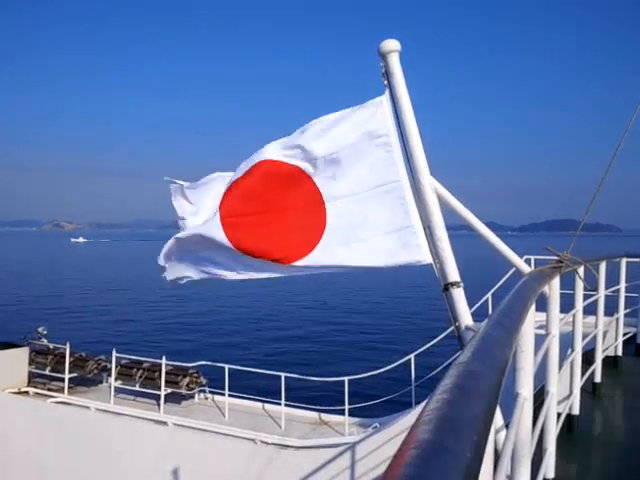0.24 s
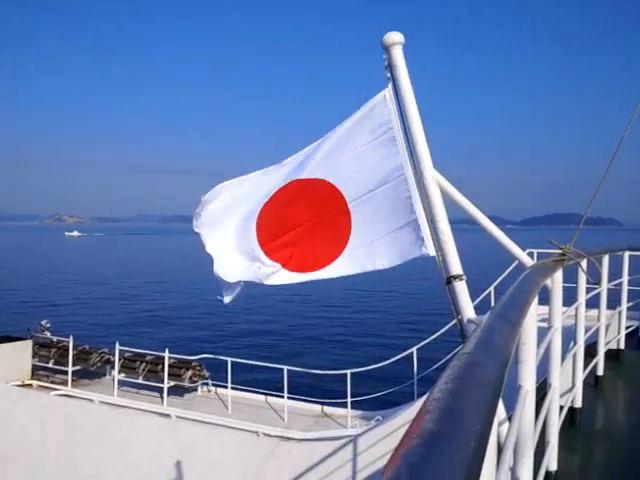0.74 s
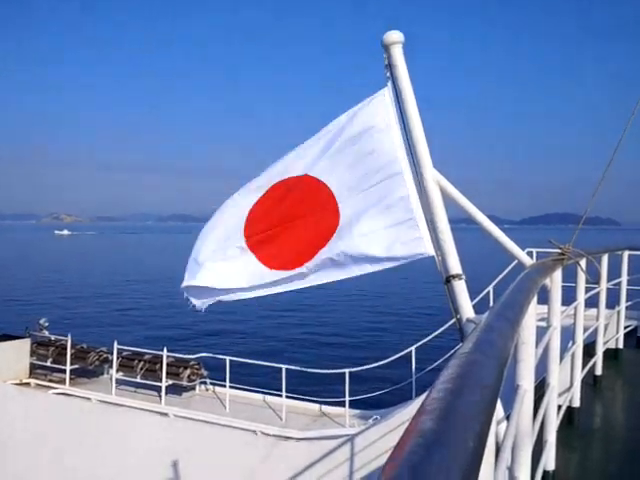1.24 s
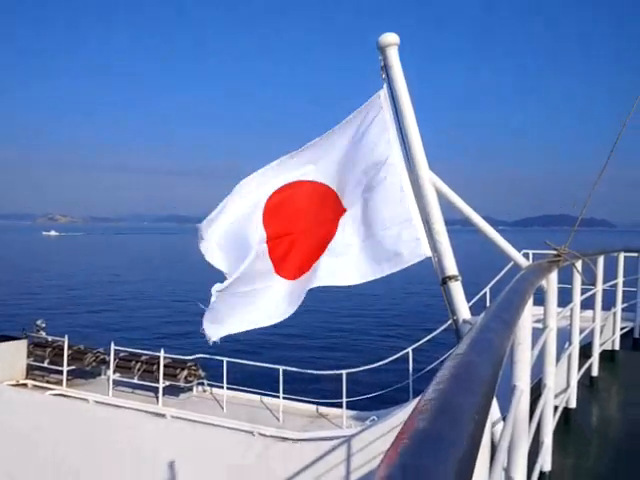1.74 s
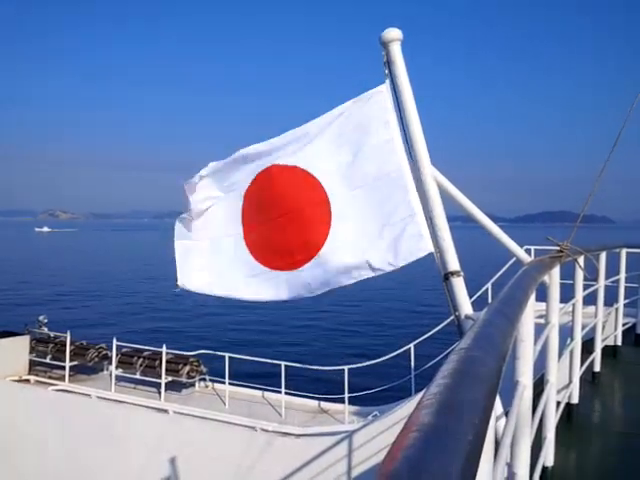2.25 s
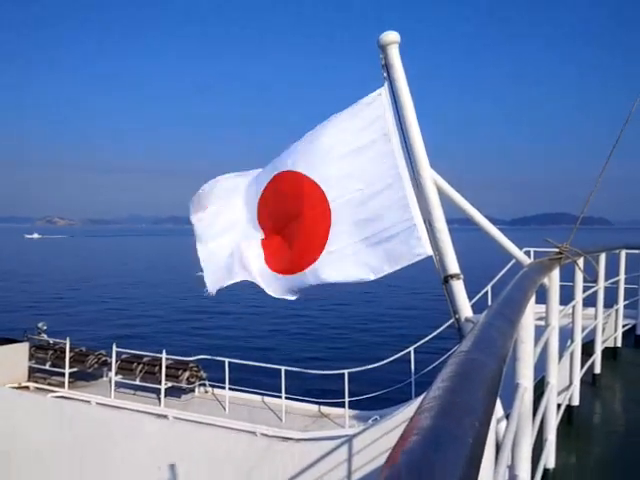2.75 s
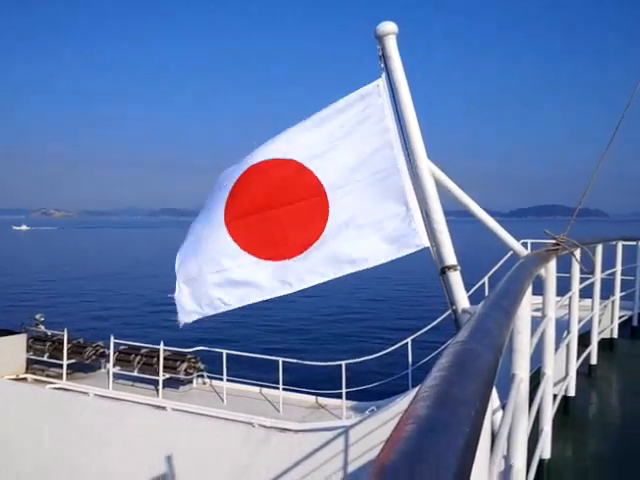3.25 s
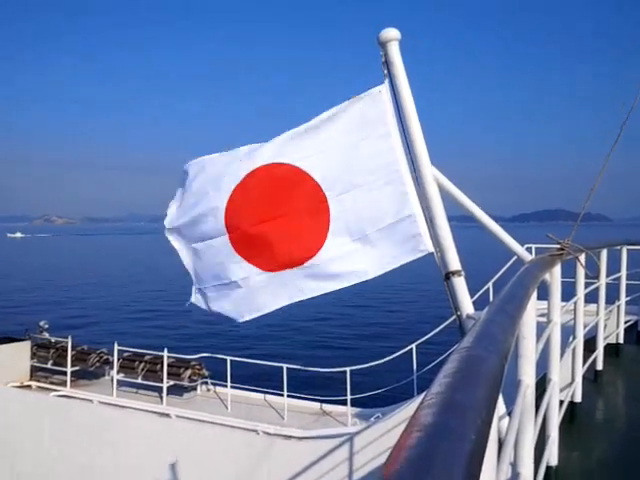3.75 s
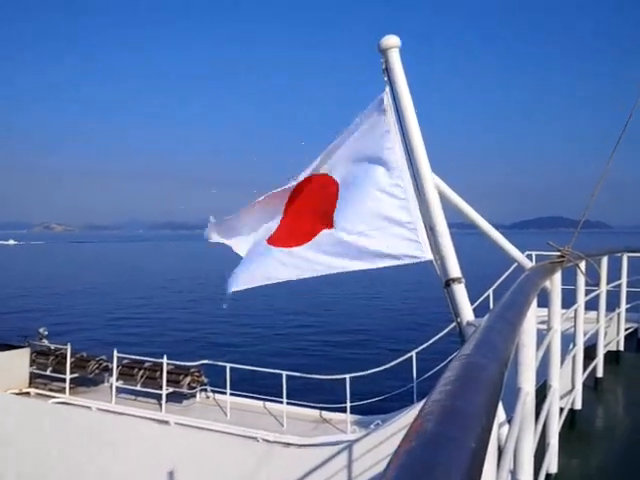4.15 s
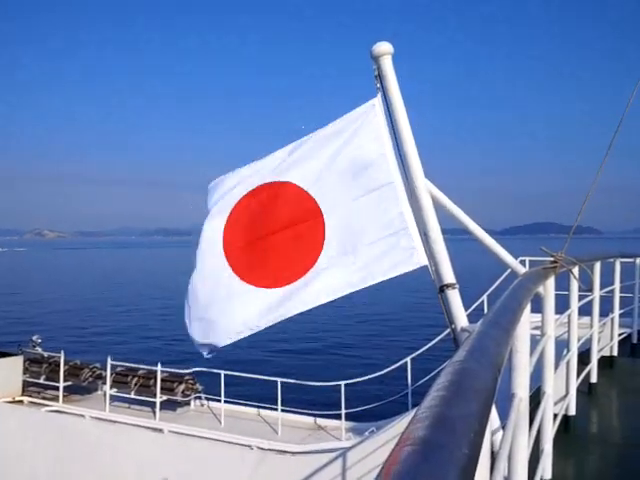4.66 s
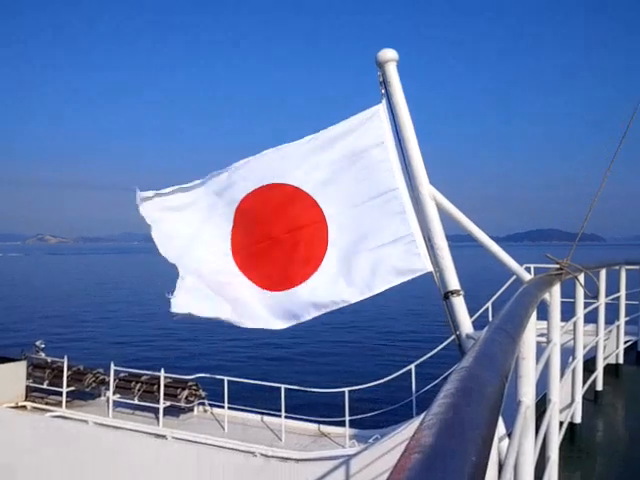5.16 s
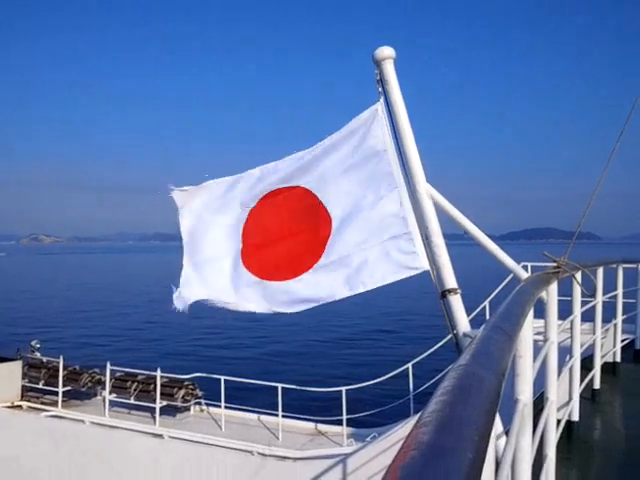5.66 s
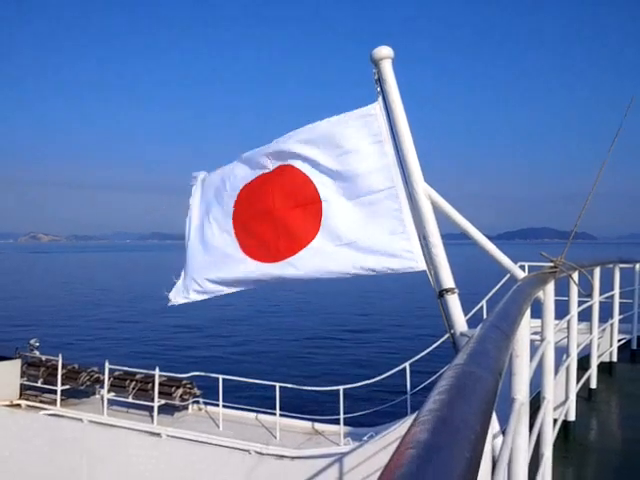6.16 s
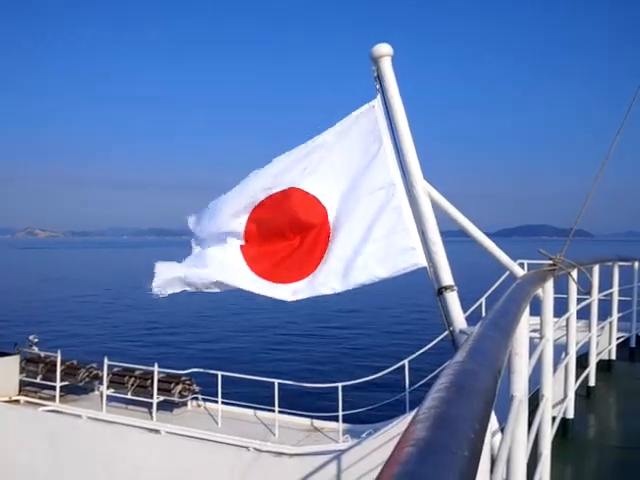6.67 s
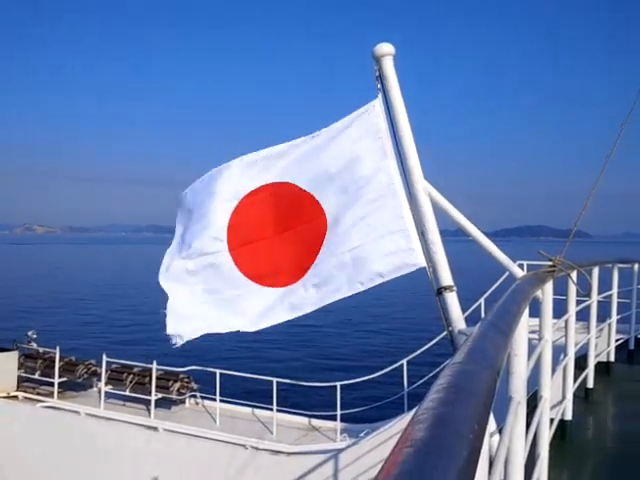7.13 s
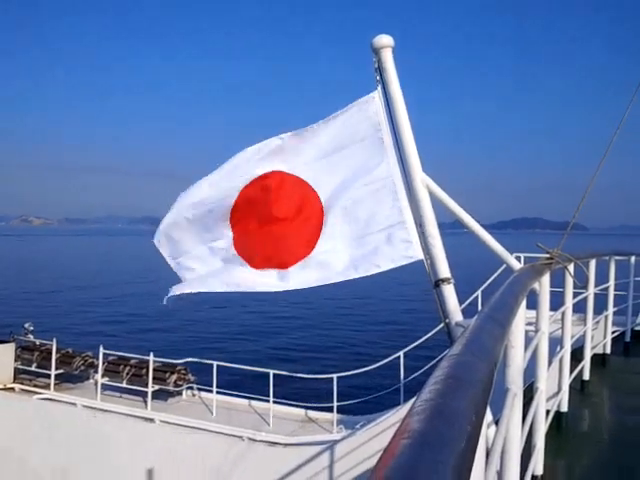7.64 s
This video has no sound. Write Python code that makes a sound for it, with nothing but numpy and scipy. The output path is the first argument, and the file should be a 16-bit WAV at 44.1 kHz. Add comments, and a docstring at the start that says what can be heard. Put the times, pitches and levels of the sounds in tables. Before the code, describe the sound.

Strong wind hits a small camera microphone on the open stern deck of a ship under way, for about 8 seconds. It begins at full strength: fast, irregular low thumps and knocks, overloaded and close, chopping the rush of air into a rough rasp. The deepest bass is thinned and the top is dull. Behind it, engine rumble, a low hum, thin wavering machinery whines and the soft hiss of foaming wake run throughout. Hard slaps with a short crackle pop at about 0.3, 0.9, 1.6, 2.1, 2.4, 3.6, 4.0 and 4.6 seconds, among softer buffets; a heavier thump lands near 5.5. The wake hiss rises gently around 5.8, and faint breathy whistles and puffs pass near 6.3 to 6.5. At 6.8 to 6.95 one fierce gust delivers a rapid volley of loud slaps, followed by single ones near 7.0 and 7.4. Buffeting continues, easing slightly at the end.

```python
"""Strong wind buffets a small camera's microphone on the stern deck of a ship under way.
From the start, huge swings of pressure overload the diaphragm: they thump, and chop the rush of air into a rasp.
Behind them machinery hums and whines and the wake hisses; soon eddies slap the port, and soft puffs of hiss pass.
The wake swells slowly once, a little before one hard gust hits the port with a volley of slaps near the end."""
import sys
import numpy as np
from scipy import signal
from scipy.fft import rfft, irfft
from scipy.io import wavfile
from scipy.ndimage import uniform_filter1d

SR = 44100
rng = np.random.default_rng(int(sys.argv[2]) if len(sys.argv) > 2 else 0)


def store_wav(level_fs):
    """Save 16-bit WAV to argv[1]."""
    pcm = np.round(np.clip(np.atleast_2d(level_fs), -1, 1) * 32767)
    wavfile.write(sys.argv[1], SR, pcm.T.astype(np.int16))


N = 348390
TIME = np.arange(N) / SR
FREQS = np.fft.rfftfreq(N, 1 / SR)


def amp(db):
    """Decibels to gain."""
    return 10 ** (np.asarray(db) / 20)


def unit(x):
    """Scales to rms 1."""
    return x / np.sqrt(np.mean(x ** 2) + 1e-20)


def noise():
    """White noise, the raw material of every breath, hiss and rumble."""
    return rng.standard_normal(N)


def colour(x, points):
    """Causal minimum-phase filter with the given spectrum, falling 24 dB per octave beyond its ends."""
    hz, db = np.transpose(points)
    octave, knots = np.log2(FREQS + 1), np.log2(hz)
    outside = abs(octave - np.clip(octave, knots[0], knots[-1]))
    gain_db = np.maximum(np.interp(octave, knots, db) - 24 * outside, -100)
    cepstrum = irfft(np.log(amp(gain_db)), N)
    # folding the cepstrum onto positive times makes the filter causal
    folded = cepstrum * (1 + np.sign(N / 2 - np.arange(N)))
    folded[0] = cepstrum[0]
    return irfft(rfft(x) * np.exp(rfft(folded)), N)


def wander(slow_hz, fast_hz):
    """Random motion of rms 1, with about equal power in each octave between two rates."""
    coarse = TIME[::30]
    hz = np.fft.rfftfreq(len(coarse), coarse[1])
    shape = hz / (hz + slow_hz) ** 1.5 / np.sqrt(1 + (hz / fast_hz) ** 4)
    spectrum = rfft(rng.standard_normal(len(coarse))) * shape
    return unit(np.interp(TIME, coarse, irfft(spectrum, len(coarse))))


def low_cut(x, corner_hz):
    """The microphone's steep wind filter."""
    return signal.sosfilt(signal.butter(N=7, Wn=corner_hz, btype="high", fs=SR, output="sos"), x)


def steadied(x, span_s):
    """Holds the slow level at 1 and keeps the fast flutter."""
    window = signal.windows.hann(max(int(span_s * SR), 8))
    power = signal.oaconvolve(x ** 2, window / window.sum(), "same")
    return x / np.sqrt(np.maximum(power, 1e-12))


def burst(x, s, hz, width_hz, db, half_s):
    """One band of x swells and fades once."""
    near = abs(TIME - s) < 2 * half_s + 0.05
    part = x[near]
    band = np.exp(-((np.fft.rfftfreq(len(part), 1 / SR) - hz) / width_hz) ** 2)
    banded = irfft(rfft(part) * band, len(part))
    swell = amp(db) * np.exp(-((TIME[near] - s) / half_s) ** 2)
    out = np.zeros(N)
    out[near] = steadied(banded, span_s=2 * half_s + 0.025) * swell
    return out


# spectrum of the wind's pressure on the diaphragm: (frequency [Hz], density [dB per Hz])
PRESSURE_COLOUR = [(8, -7), (25, -1.5), (60, -3.5), (120, -8), (240, -10), (480, -18.5), (1000, -43)]


def diaphragm(held):
    """Wind pressure drives the diaphragm into its stops: its travel, and the sensitivity left for other sound."""
    drive, lean, stall_pressure = 1.02, 0.25, 2.1  # pressures; 1 is well into the curve towards a stop
    swings = steadied(colour(noise(), PRESSURE_COLOUR), span_s=0.1)
    pressure = drive * swings + lean
    travel = np.tanh(pressure * (1 - held) + stall_pressure * held)
    return travel, 1 - travel ** 2  # the slope of tanh


def airflow():
    """The speed of the air over the deck wavers a little about its mean, as a gain."""
    waver_db = 0.76
    return amp(waver_db * wander(slow_hz=3.2, fast_hz=10))


# filter colours of the thumps and of their rattling flanks: (frequency [Hz], gain [dB])
THUMP_COLOUR = [(60, -27.5), (100, -24), (140, -14), (168, -1.5), (220, 1), (300, 3), (400, -0.5),
                (500, -4.5), (600, -7), (900, -33.5)]
RATTLE_COLOUR = [(300, -26), (400, -0.5), (480, -3), (720, 4), (950, -5.5), (1500, 1.5), (3000, -3)]
# eddies that swell and pass over the steady wind:
# (time [s], pitch [Hz], level [dB], half duration [s])
BUFFETS_OF_WIND = [(0.027, 234, -25.5, 0.025), (0.176, 225, -32, 0.041), (.35, 430, -29, 0.015),
                   (0.575, 228, -21.5, 0.023), (0.61, 480, -28, 0.027), (0.935, 293, -33, 0.032),
                   (0.973, 375, -25, 0.022), (1.065, 210, -24.5, 0.037), (1.09, 443, -30, 0.02),
                   (1.39, 260, -32, 0.11), (1.785, 251, -26.5, .045), (1.85, 526, -28, 0.073),
                   (2.134, 278, -29.5, 0.13), (2.12, 280, -26, 0.014), (2.122, 470, -29.5, 0.064),
                   (2.453, 317, -24, 0.012), (2.625, 250, -30.5, 0.054), (2.787, 283, -30, 0.048),
                   (3.015, 246, -20, 0.016), (3.42, 338, -26, 0.027), (3.47, 292, -25.5, 0.031),
                   (3.893, 205, -26, 0.065), (4.266, 248, -23.5, 0.033), (4.286, 465, -29, 0.027),
                   (4.354, 278, -22.5, 0.022), (4.495, 517, -27, 0.03), (4.72, 219, -24, 0.15),
                   (5.083, 235, -27.5, 0.047), (5.088, 400, -32.5, 0.036), (5.322, 317, -31, 0.023),
                   (5.529, 225, -17, 0.023), (5.516, 420, -33, .035), (5.8, 260, -30, 0.03),
                   (5.909, 232, -23, 0.022), (6.327, 195, -24.5, 0.027), (6.41, 390, -26, 0.023),
                   (6.743, 230, -29, 0.038), (6.927, 305, -18, 0.021), (6.91, 500, -26, 0.02),
                   (7.16, 340, -28, 0.049), (7.275, 367, -28.5, 0.024), (7.413, 265, -29, 0.025),
                   (7.55, 264, -25, 0.046)]


def wind(travel, flow):
    """Swings from stop to stop thump and their steep flanks rattle; a buffet swells thumps at its own pitch."""
    deep_db, knock_db, rattle_db = -29, -29, -33.5  # large eddies, smaller ones, flanks
    deep_restless_db, knock_restless_db = 1.1, 1.0
    split_hz, core_share = 269.0, 0.18  # core_share: a buffet's bandwidth as a share of its pitch
    thump = low_cut(colour(travel, THUMP_COLOUR), corner_hz=129.7)
    large = irfft(rfft(thump) / (1 + (FREQS / split_hz) ** 10), N)
    deep_level = amp(deep_db + deep_restless_db * wander(slow_hz=3.5, fast_hz=12.0))
    deep = steadied(large, span_s=0.048) * deep_level
    knock_level = amp(knock_db + knock_restless_db * wander(slow_hz=3.4, fast_hz=8.7))
    knock = steadied(thump - large, span_s=0.11) * knock_level
    buffets = sum(burst(thump, s, hz, core_share * hz, db, half_s) for s, hz, db, half_s in BUFFETS_OF_WIND)
    rattle = steadied(colour(travel, RATTLE_COLOUR), span_s=0.23) * flow * amp(rattle_db)
    return (deep + knock) * lull() + buffets + rattle


# colour of the rushing air: (frequency [Hz], density [dB per Hz])
RUSH_COLOUR = [(300, -10.5), (500, -2.5), (750, -2), (950, -2.5), (1350, -4.5), (1700, -9.5), (2000, -13),
               (2500, -18.5), (3100, -30), (4500, -43.5), (8000, -46)]
# brief breathy whistles: (time [s], pitch [Hz], width [Hz], level [dB], half duration [s])
EDGE_WHISTLES = [(.01, 1320, 70, -34, 0.044), (0.349, 1410, 280, -31, 0.015), (1.164, 1660, 80, -38, 0.018),
                 (4.988, 1790, 170, -41, 0.094), (6.255, 1285, 30, -33, 0.038),
                 (6.387, 1290, 64.5, -36, 0.027), (6.432, 1320, 60, -33.5, 0.02),
                 (6.498, 1096, 80.6, -35.5, 0.1), (6.848, 755, 60, -25, .025),
                 (6.915, 900, 60, -24.5, 0.03), (7.124, 1500, 400, -35.5, 0.021),
                 (7.495, 1303, 105, -28, 0.031)]


def air(flow):
    """Air rushes over the deck and now and then sings briefly on an edge."""
    rush_db = -32.0
    rush = unit(colour(noise(), RUSH_COLOUR)) * flow * amp(rush_db)
    turbulence = noise()
    return rush + sum(burst(turbulence, *whistle) for whistle in EDGE_WHISTLES)


# colour of the engine's rumble: (frequency [Hz], density [dB per Hz])
RUMBLE_COLOUR = [(80, -27), (100, -20.5), (125, -6.5), (165, 0.5), (210, -11), (300, -10)]
# steady tones of the ship's machinery: (pitch [Hz], level [dB])
MACHINE_TONES = [(199.5, -34), (1057.5, -50), (1300.5, -44.5), (1422, -50.5), (2357.5, -56.5), (2724, -66),
                 (3750, -75), (3779, -72), (4258.5, -69.5), (4666.5, -67.5), (4972, -69.5), (5691, -74)]


def ship():
    """Engine rumble and hum, with fan and turbine tones that waver slightly."""
    rumble_db, waver_db = -37, 2.2
    drift_hz = 1.2  # at 1300.5 Hz; it grows with pitch
    out = amp(rumble_db) * unit(colour(noise(), RUMBLE_COLOUR))
    for hz, db in MACHINE_TONES:
        pitch = hz + drift_hz * hz / 1300.5 * wander(slow_hz=3.9, fast_hz=18)
        tone = np.sin(2 * np.pi * np.cumsum(pitch) / SR)
        waver = amp(waver_db * wander(slow_hz=0.36, fast_hz=3.5))
        out += amp(db) * unit(tone * waver)
    return out


# colour of the foam's hiss: (frequency [Hz], density [dB per Hz])
HISS_COLOUR = [(1200, -10), (2200, 6), (2800, 6), (3800, 1), (4900, 3.5), (5600, -2), (6100, -7.5),
               (6900, -6.5), (7400, -21.5), (8100, -18)]
# slow course of the hiss: (time [s], level [dB])
WAKE_LEVEL = [(0, -47), (1.2, -48), (3.6, -48), (5.0, -48), (5.85, -45.5), (6.8, -47), (7.9, -48)]
# faint narrow bands of steady noise within the hiss: (pitch [Hz], width [Hz], level [dB])
NARROW_BANDS = [(5548, 45, -70.5), (5705, 50, -73.5), (6200, 70, -74.5), (6700, 40, -78), (6890, 35, -76.5)]


def wake():
    """Foam hisses behind the stern, with faint narrow bands of steady noise within the hiss."""
    shimmer_db = 0.94
    hiss = unit(colour(noise(), HISS_COLOUR))
    level_db = np.interp(TIME, *np.transpose(WAKE_LEVEL)) + shimmer_db * wander(slow_hz=0.63, fast_hz=60)
    out = hiss * amp(level_db)
    spectrum = rfft(noise())
    for hz, width_hz, db in NARROW_BANDS:
        band = np.exp(-((FREQS - hz) / width_hz) ** 2)
        out += amp(db) * unit(irfft(spectrum * band, N))
    return out


# moments when the wind holds the diaphragm at its stop: (time [s], half duration [s])
STALL_TIMES = [(0.268, 0.0029), (0.421, 0.0034), (0.453, 0.0049), (0.731, 0.0033), (0.8, 0.0021),
               (0.865, .004), (1.214, 0.0043), (1.56, 0.0044), (1.623, 0.0027), (1.692, 0.004),
               (1.953, 0.0038), (2.084, .004), (2.144, 0.0024), (2.315, 0.0038), (2.421, 0.0035),
               (3.337, 0.0031), (3.389, 0.0042), (3.586, 0.0046), (3.777, 0.0026), (3.993, 0.0039),
               (6.089, 0.0031), (6.446, 0.0031), (6.806, 0.0034), (6.876, 0.0023), (7.024, 0.004),
               (7.363, 0.0035)]


def stalled():
    """Rises to 1 while the wind holds the diaphragm at its stop."""
    holds = sum(np.exp(-((TIME - s) / half_s) ** 4) for s, half_s in STALL_TIMES)
    return np.minimum(holds, 1)


# colour of a slap's crackle: (frequency [Hz], density [dB per Hz])
CRACKLE_COLOUR = [(700, 6), (1500, 5.5), (2400, -7), (3600, -9.5), (4300, -28.5)]
# hard eddies that slap the port, singly or in the quick volley of one gust:
# (onset time [s], pitch [Hz], envelope peak [dB], time to the peak [s], crackle relative to the ring [dB])
PORT_SLAPS = [(.269, 500, -24, .0007, -14), (.346, 510, -14, 0.0014, -12), (.889, 500, -16, 0.00071, -15),
              (1.560, 566, -16, 0.0008, -17), (1.633, 620, -15, .0007, -12),
              (2.089, 485, -11.5, 0.00065, -16), (2.44, 324, -15, 0.0019, -20),
              (3.591, 700, -19, 0.00065, -12.5), (3.997, 500, -19, 0.00065, -12),
              (4.617, 600, -14, 0.00067, -14), (6.828, 670, -22, .0015, -16),
              (6.8325, 700, -14, 0.0011, -16), (6.858, 418, -12, 0.00093, -20),
              (6.8655, 520, -8.5, 0.00074, -13), (6.8695, 600, -16, .0007, -14),
              (6.8885, 710, -18, 0.0017, -12), (6.8996, 616, -8.5, 0.0013, -15),
              (6.9136, 570, -10, 0.0011, -12), (6.9228, 445, -10, 0.00087, -12),
              (6.9285, 456, -9, .001, -11), (6.9328, 456, -9, 0.00077, -13), (6.939, 500, -14, 0.00054, -8),
              (6.9408, 564, -14, .0006, -7), (7.034, 450, -12.5, .001, -13),
              (7.372, 380, -12, 0.00084, -19)]


def slaps():
    """A hard eddy rings the port for a few cycles at most, with a crackle on its steep flanks."""
    grit = steadied(colour(noise(), CRACKLE_COLOUR), span_s=0.01)
    out = np.zeros(N)
    for s, hz, db, rise_s, crackle_db in PORT_SLAPS:
        near = (TIME > s) & (TIME < s + 10 * rise_s)
        t = TIME[near] - s
        turn = 2 * np.pi * hz * t
        crackle = amp(crackle_db) * grit[near] * abs(np.cos(turn))
        envelope = t / rise_s * np.exp(1 - t / rise_s)
        out[near] += amp(db) * envelope * (np.sin(turn) + crackle)
    return low_cut(out, corner_hz=148)


# lulls between buffets: (time [s], depth [dB], half duration [s])
LULL_TIMES = [(0.303, 2.5, 0.043), (0.47, 3, 0.049), (0.766, 1.5, .06), (1.614, 2.5, 0.15), (2.38, 0, .03),
              (2.92, 2, .05), (3.21, 3, 0.031), (3.68, 3, 0.089), (4.16, 2, 0.034), (5.405, 1.5, .035),
              (5.686, 1, 0.043), (6.063, 4, 0.055), (6.246, 3, 0.018), (6.566, 0.5, .06), (7.852, 6, 0.037)]


def lull():
    """Gain of the steady thumping, which sags between buffets."""
    return amp(-sum(db * np.exp(-((TIME - s) / half_s) ** 2) for s, db, half_s in LULL_TIMES))


# brief soft puffs of high hiss: (time [s], pitch [Hz], width [Hz], level [dB], half duration [s])
HISS_PUFFS = [(.33, 4500, 1800, -49, .04), (6.333, 5800, 900, -52, 0.021), (6.338, 8000, 600, -58, 0.017),
              (6.386, 7940, 600, -61, .028), (6.92, 8100, 600, -59.5, 0.059),
              (6.925, 3080, 750, -49, 0.031), (7.0, 3800, 2000, -49.5, .07), (7.668, 5560, 800, -51, .035)]


def puffs():
    """Short puffs of hiss, each a band of noise that swells and fades, some in the middle treble, some near 8 kHz."""
    breath = noise()
    return sum(burst(breath, *puff) for puff in HISS_PUFFS)


def scene():
    """Other sound drops out for milliseconds near a stop, the treble less; a slap crowds out the thumping."""
    rush_leak, hiss_leak = 0.05, 1.4  # sensitivity that remains at a stop, before levelling
    stall_db, crowding_db = -7, -16.5
    held = stalled()
    travel, sensitivity = diaphragm(held)
    flow = airflow()
    thumping = wind(travel, flow) * amp(stall_db * held)
    middle = (air(flow) + ship()) * steadied(sensitivity + rush_leak, span_s=0.14)
    hits = slaps()
    treble = (wake() + puffs()) * unit(sensitivity + hiss_leak)
    hit_power = uniform_filter1d(hits ** 2, size=130)  # averaged over about 3 ms
    room_left = 1 / np.sqrt(1 + hit_power / amp(crowding_db) ** 2)
    return ((thumping + middle) * room_left + hits + treble)[None]


def record(dry):
    """The wind filter removes the deep bass, the strongest peaks are rounded off, and the band is limited."""
    ceiling, edge_hz = 0.34, 8300
    filtered = low_cut(dry, corner_hz=120.3)
    rounded = filtered / (1 + (filtered / ceiling) ** 4) ** 0.25
    cleaned = low_cut(rounded, corner_hz=87)
    band_limit = signal.firwin(511, edge_hz, window=("kaiser", 9), fs=SR)
    return signal.oaconvolve(cleaned, band_limit[None], "same")


dry = scene()
out = record(dry)
store_wav(out)
```